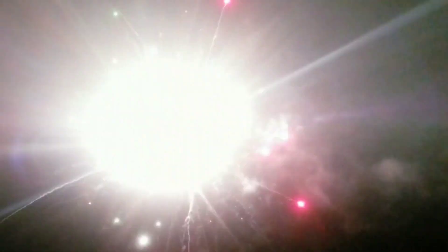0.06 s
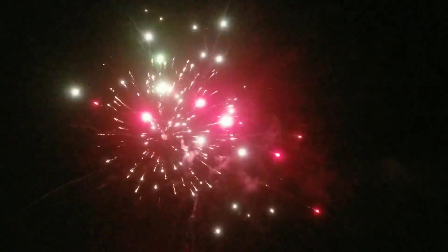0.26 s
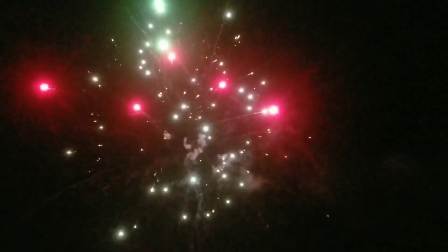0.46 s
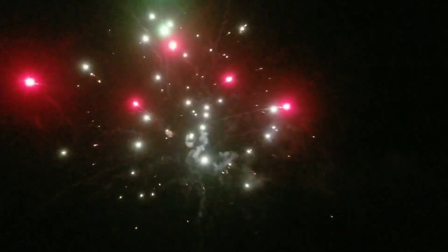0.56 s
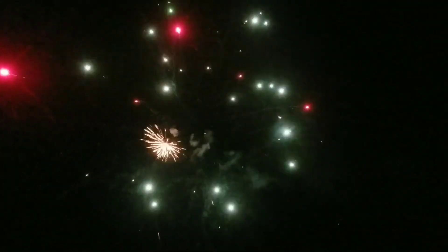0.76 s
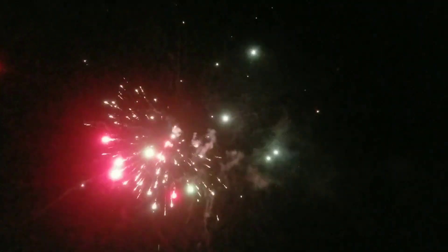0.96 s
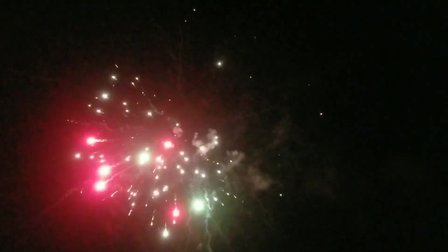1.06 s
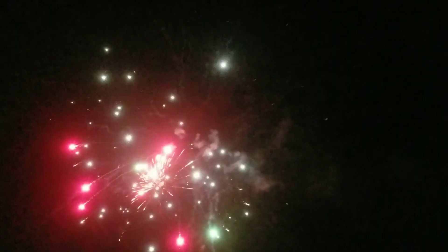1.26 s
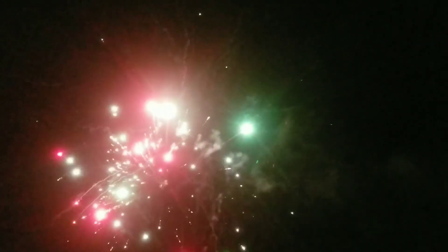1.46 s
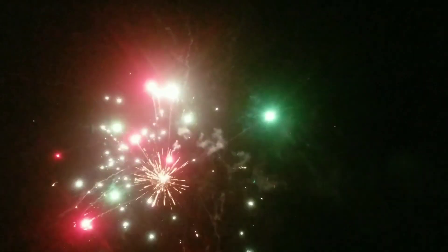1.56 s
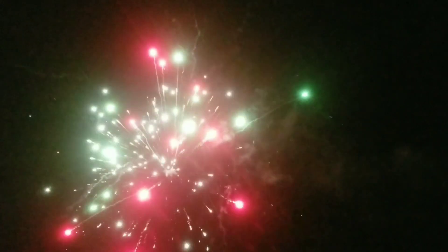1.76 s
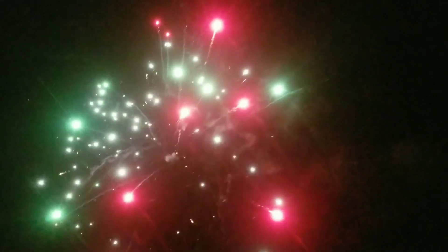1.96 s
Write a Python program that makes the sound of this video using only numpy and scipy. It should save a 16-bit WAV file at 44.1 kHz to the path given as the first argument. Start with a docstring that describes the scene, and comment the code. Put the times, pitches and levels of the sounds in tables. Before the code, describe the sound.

Fireworks burst overhead outdoors, starting with a hard, sharp bang at about 0.2 seconds. A smaller, drier launch pop follows at 0.5 seconds. Three more loud bangs come at 0.9, 1.4 and 1.7 seconds, with very faint crackles around 1.2 seconds. Each bang slightly overloads the microphone and trails off in a long rolling echo, while a faint low rumble hangs underneath.

```python
"""A faint rush, then a hard bang: a firework cake at night, four shell bursts overhead and one lift pop.
Each burst is a shock wave that hits twice, direct and off the ground, and overloads the phone's mics.
Nearby objects scatter it and the landscape answers with a long rolling echo. Burning stars crackle
faintly, and the rumble of earlier shots hangs in the air."""
import sys
import numpy as np
from scipy import signal
from scipy.fft import rfft, irfft
from scipy.io import wavfile
from scipy.ndimage import uniform_filter1d

SR = 44100
rng = np.random.default_rng(int(sys.argv[2]) if len(sys.argv) > 2 else 0)


def put_to_file(sound):
    """Save the sound as 16-bit audio at rate SR, in the file named by the first command-line argument."""
    columns = np.atleast_2d(sound).T  # one column per channel
    safe = np.clip(columns, -1, 1)
    whole_steps = np.round(safe * 32767)
    wavfile.write(sys.argv[1], SR, whole_steps.astype(np.int16))


N = 88200

# shell bursts: (time [s], level [dB], ground bounce delay [ms], bounce gain [dB], echo send [dB])
SHELLS = [(0.215, 7, 6.56, -3.5, 3), (0.91, 6, 6.24, -1.5, -1), (1.3682, 7.5, 5.49, -2, 0),
          (1.6758, 7.5, 5.61, -2.5, 0.37)]
# snaps of burning stars: (time [s], level [dB])
STAR_SNAPS = [(1.183, -45), (1.234, -48), (1.266, -55)]
# landscape tail: (frequency [Hz], starting level [dB per Hz], t60 [s], right over left [dB])
LANDSCAPE_ECHO = [(25.5, -95, 1.4, -11), (61.4, -80, 1.3, 0), (117.6, -68.5, 1.9, 0), (235, -63.5, 1.7, -1),
                  (494, -68.5, 1.29, -1.5), (633, -78, 1.36, 1.5), (1100, -79.5, 1.34, -1),
                  (2200, -84.5, 1.18, 3), (4120, -87.5, 0.8, 5.5), (5870, -93, 0.66, 0),
                  (7280, -97.5, 0.52, -5), (11000, -87, 0.37, -0.5), (15500, -90, 0.34, -0.5)]
# short tail off nearby objects: (frequency [Hz], starting level [dB per Hz])
NEAR_ECHO = [(25, -91.5), (100, -72), (250, -63), (900, -66.5), (2000, -73.5), (3600, -72.5), (7000, -89),
             (15000, -94)]
# swells off far obstacles: (delay [s], half width [s], boost [dB], centre [Hz], half width [octaves])
FAR_REFLECTIONS = [(0.12, 0.022, 3.5, 225, 2.8), (.12, 0.01, 0, 1190, 1.3), (.28, 0.084, 5, 2360, 0.59)]
# soft rushes of climbing shells: (time [s], half width [s], level [dB per Hz])
CLIMBS = [(.17, 0.04, -96.5), (.81, 0.047, -94.5)]
# bed of lingering rumble and night air: (frequency [Hz], level [dB per Hz])
NIGHT_BED = [(25, -104), (60, -88.5), (120, -76), (250, -79), (480, -84.5), (660, -98), (1500, -104),
             (2500, -112), (4000, -127), (7000, -133), (15500, -133)]
# microphone colour on the blasts: (frequency [Hz], gain [dB])
MIC_EQ = [(30, -8.5), (120, 3.5), (350, 2), (700, -1.5), (1200, 0), (2500, -1), (4500, -.5), (7200, -8),
          (10500, 1), (15500, -5)]

BLAST_MS, SUCTION_DECAY = 1.7, .3  # length of the overpressure; how fast the suction dies
SHOCK_MS, SWELL_MS = .04, 0.43  # the attack: a steep front, then a slower swell
BOUNCE_LAG_MS = 0.061  # the ground bounce reaches the left mic later
SCATTER_HZ, SCATTER_TOP_HZ, SCATTER_RIGHT_DB = 960, 7500, 4
LIFT_S, LIFT_DB, LIFT_ECHO_DB, LIFT_RISE_MS, LIFT_FALL_MS = .50247, -11, -31, 0.392, 0.533
CRACKLE_HZ, CRACKLE_MS = (1800, 4540), 1.8
NEAR_T60_S, NEAR_RIGHT_DB, PREDELAY_S, BUILD_S = 0.17, 4, 0.001, 0.0037
ROLL_DB, FLICKER_DB, ROLL_PER_S = 1.6, 2.0, 55  # level wobble: shared, per band, and its pace
LOW_CUT_HZ, LOW_CUT_Q, PORT_GAP_M = (257, 279), 0.99, 0.19
OVERLOAD, OVERLOAD_BIAS = 1.92, (0.36, 0.002)  # soft-clip scale; lopsidedness left and right
PAN = np.array([[-.5], [.5]])  # splits a right-over-left amount between the channels


def shell_bursts():
    """Each shell hits directly, scattering off hand and phone, then again off the rough ground."""
    out = 0
    for start, db, bounce_ms, bounce_db, _ in SHELLS:
        direct = scatter(blast(start, shock_share=0.37), db=-3, decay_ms=4.1)
        bounce_s = start + (bounce_ms - BOUNCE_LAG_MS * PAN) / 1000
        bounce = scatter(blast(bounce_s, shock_share=0.52), db=0, decay_ms=2.26)
        out = out + undb(db) * (direct + undb(bounce_db) * bounce)
    return out


def blast(start, shock_share):
    """A shock front, a falling overpressure and the suction that follows."""
    ms = 1000 * np.maximum(np.arange(N) / SR - start, 0)
    front = 1 - shock_share * np.exp(-ms / SHOCK_MS) - (1 - shock_share) * np.exp(-ms / SWELL_MS)
    return front * (1 - ms / BLAST_MS) * np.exp(-SUCTION_DECAY * ms / BLAST_MS)


def scatter(wave, db, decay_ms, size=1800):
    """The wave plus a brief spray of small reflections, different at each mic."""
    ms = 1000 * np.arange(size) / SR
    spray = rng.standard_normal((2, size)) * np.exp(-ms / decay_ms)
    spray = spray / np.linalg.norm(spray, axis=1, keepdims=True) * undb(db + SCATTER_RIGHT_DB * PAN)
    spray = butter(spray, 3, SCATTER_HZ, "high")
    spray = butter(spray, 1, SCATTER_TOP_HZ, "low")
    return wave + signal.fftconvolve(np.atleast_2d(wave), spray, axes=1)[:, :N]


def lift_charge(shock=0.08, shock_ms=0.68):
    """A pop at ground level: one puff of gas leaves the tube with a weak, scattered shock front."""
    ms = 1000 * (np.arange(N) / SR - LIFT_S)
    puff = np.interp(ms, [0, LIFT_RISE_MS, LIFT_RISE_MS + LIFT_FALL_MS], [0, 1, 0])
    front = shock * (ms > 0) * np.exp(-np.abs(ms) / shock_ms)
    return undb(LIFT_DB) * (puff + scatter(front, db=-1, decay_ms=8.6))


def microphone(blasts, size=1024):
    """Each capsule's own low cut swings the blasts below zero and back; the ports colour the tone."""
    low_cuts = [signal.bilinear([1, 0, 0], [1, w / LOW_CUT_Q, w * w], SR)
                for w in 2 * np.pi * np.array(LOW_CUT_HZ)]
    thinned = np.array([signal.lfilter(b, a, side) for (b, a), side in zip(low_cuts, blasts)])
    cepstrum = irfft(np.log(undb(curve(MIC_EQ, np.fft.rfftfreq(size, 1 / SR)))))
    fold = np.r_[1, np.full(size // 2 - 1, 2), 1, np.zeros(size // 2 - 1)]  # minimum phase: no pre-ring
    colour = irfft(np.exp(rfft(cepstrum * fold)))
    return signal.fftconvolve(thinned, colour[None], axes=1)[:, :N]


def port_sizzle(blasts, db=-28.5, edge_hz=3410, smooth_s=0.0051):
    """A thin hiss that rides the pressure of each blast at the mic ports."""
    pressure = uniform_filter1d(np.abs(blasts), int(smooth_s * SR), axis=1)
    hiss = butter(rng.standard_normal((2, N)), 2, edge_hz, "high")
    return undb(db) * pressure * hiss


def star_crackles():
    """Burning stars give off tiny, bright snaps of noise."""
    envelope = 0
    for start, db in STAR_SNAPS:
        age_ms = 1000 * (np.arange(N) / SR - start)
        envelope = envelope + undb(db) * (age_ms > 0) * np.exp(-np.abs(age_ms) / CRACKLE_MS)
    return butter(envelope * rng.standard_normal((2, N)), 4, CRACKLE_HZ, "band")


def echo_power(hz, t):
    """Stereo echo power in one band: nearby objects answer briefly, the landscape swells and rings on."""
    land_pan = undb(PAN * curve(LANDSCAPE_ECHO, hz, column=3))
    near_pan = undb(PAN * NEAR_RIGHT_DB * min(hz / SCATTER_HZ, 1))
    land_t60 = curve(LANDSCAPE_ECHO, hz, column=2)
    power = 0
    for start, *_, send_db in [*SHELLS, (LIFT_S, LIFT_ECHO_DB)]:
        age = np.maximum(t - start - PREDELAY_S, 0)
        far_db = sum(boost * np.exp(-((age - delay) / width) ** 2 - (np.log2(hz / centre) / octaves) ** 2)
                     for delay, width, boost, centre, octaves in FAR_REFLECTIONS)
        land = undb(curve(LANDSCAPE_ECHO, hz) - 60 * age / land_t60 + far_db) * land_pan
        near = undb(curve(NEAR_ECHO, hz) - 60 * age / NEAR_T60_S) * near_pan
        attack = 1 - np.exp(-age / BUILD_S)
        power = power + undb(send_db) ** 2 * attack * (land ** 2 + near ** 2)
    return power


def climb_rush(hz, t, centre_hz=1180, octaves=0.86):
    """One band's envelope for the soft midrange rush of climbing shells."""
    swells = sum(undb(db) * np.exp(-.5 * ((t - peak_s) / width) ** 2) for peak_s, width, db in CLIMBS)
    return swells * np.exp(-(np.log2(hz / centre_hz) / octaves) ** 2)


def surroundings():
    """Rolling echoes, climbing shells and lingering rumble, shaped from third-octave bands of noise."""
    t = np.arange(N) / SR
    spectra, roll = diffuse_spectra(), wobble()
    octave = np.log2(np.maximum(np.fft.rfftfreq(N, 1 / SR), 1))
    out = 0
    for hz in 22 * 2 ** np.arange(0, 10, 1 / 3):
        band = irfft(spectra * np.maximum(1 - 3 * np.abs(octave - np.log2(hz)), 0), N)
        uneven = undb((ROLL_DB * roll + FLICKER_DB * wobble()) / (1 + hz / 5000))  # steadier up top
        power = echo_power(hz, t) + climb_rush(hz, t) ** 2 + undb(curve(NIGHT_BED, hz)) ** 2
        out = out + band * uneven * np.sqrt(power)
    return out


def diffuse_spectra():
    """Noise from all around reaches two spaced mics: centred in the bass, wide in the treble."""
    coherence = np.sinc(2 * np.fft.rfftfreq(N, 1 / SR) * PORT_GAP_M / 343)
    mid, side = rfft(rng.standard_normal((2, N)))
    mid, side = mid * np.sqrt((1 + coherence) / 2), side * np.sqrt((1 - coherence) / 2)
    return np.array([mid + side, mid - side]) * np.sqrt(SR / 2)


def wobble():
    """Smooth random motion with a spread of 1."""
    hold = int(SR / ROLL_PER_S)
    steps = np.repeat(rng.standard_normal(N // hold + 2), hold)
    glide = uniform_filter1d(steps, hold)[:N]
    return glide / glide.std()


def butter(x, order, hz, kind):
    """A low-, high- or band-pass with a flat passband."""
    return signal.sosfilt(signal.butter(order, hz, kind, fs=SR, output="sos"), x)


def curve(table, hz, column=1):
    """One column of a table, interpolated on a log-frequency axis."""
    table = np.array(table, float)
    return np.interp(np.log(np.maximum(hz, 1)), np.log(table[:, 0]), table[:, column])


def undb(db):
    """Decibels to gain."""
    return 10 ** (np.asarray(db) / 20)


def scene():
    """Blasts up front, with the landscape answering behind."""
    blasts = microphone(shell_bursts() + lift_charge())
    return blasts + port_sizzle(blasts) + star_crackles() + surroundings()


def record(dry):
    """The phone soft-clips the loudest peaks, a little lopsidedly, and cuts the top above 15.9 kHz."""
    bias = np.array(OVERLOAD_BIAS)[:, None]
    rounded = OVERLOAD * (np.tanh(dry / OVERLOAD + bias) - np.tanh(bias))
    return signal.sosfilt(signal.ellip(10, .2, 80, 15900, fs=SR, output="sos"), rounded)


dry = scene()
out = record(dry)
put_to_file(out)
```